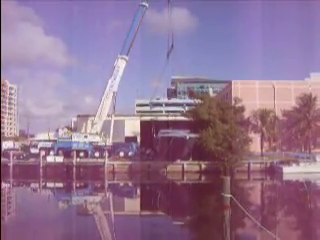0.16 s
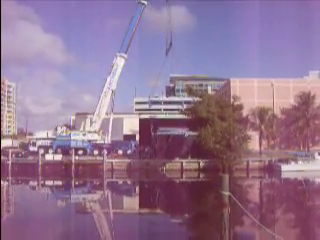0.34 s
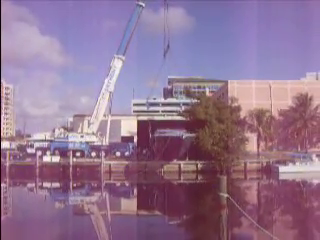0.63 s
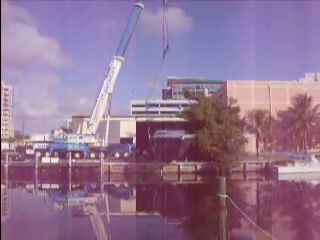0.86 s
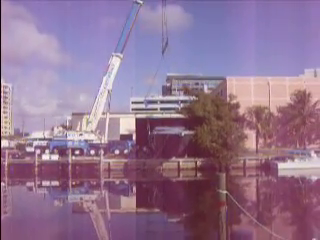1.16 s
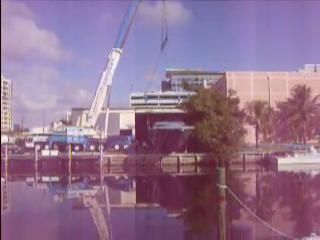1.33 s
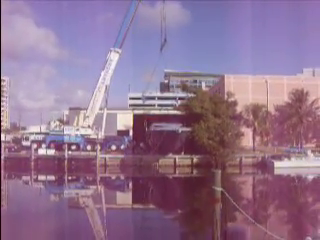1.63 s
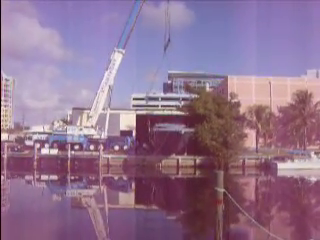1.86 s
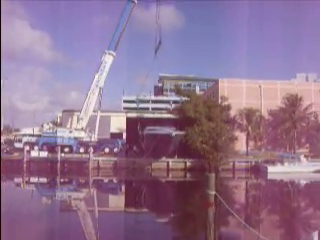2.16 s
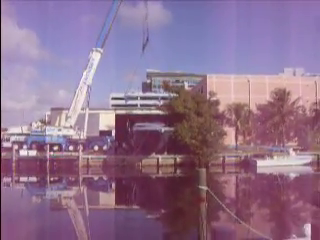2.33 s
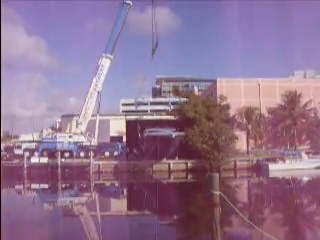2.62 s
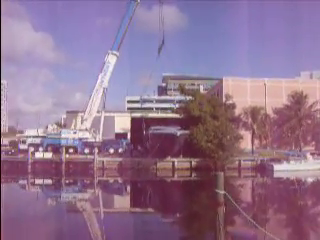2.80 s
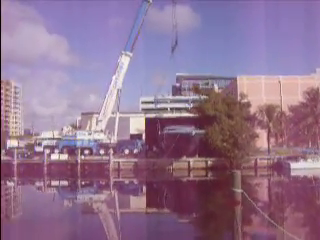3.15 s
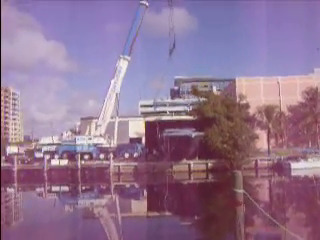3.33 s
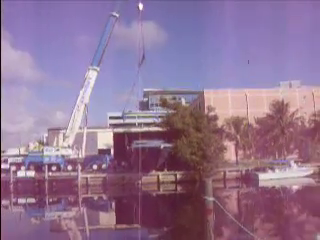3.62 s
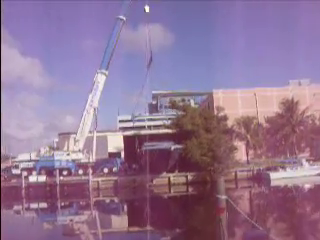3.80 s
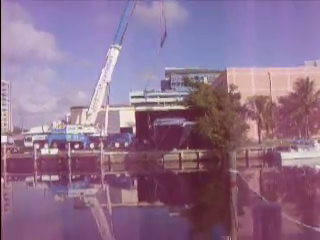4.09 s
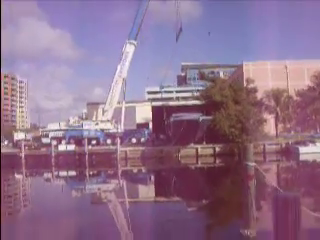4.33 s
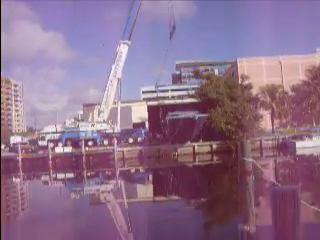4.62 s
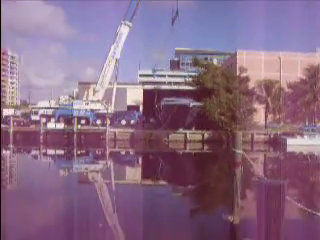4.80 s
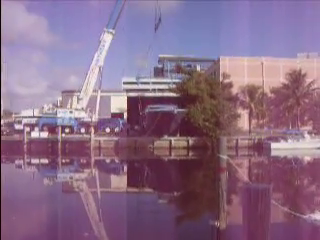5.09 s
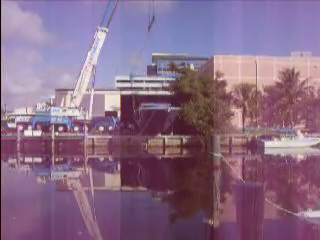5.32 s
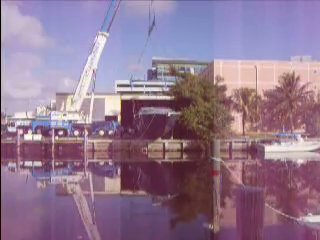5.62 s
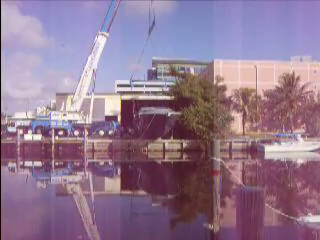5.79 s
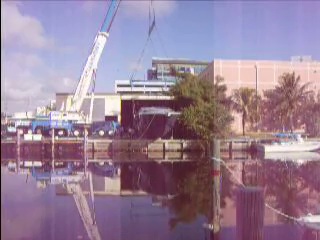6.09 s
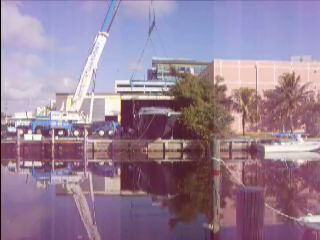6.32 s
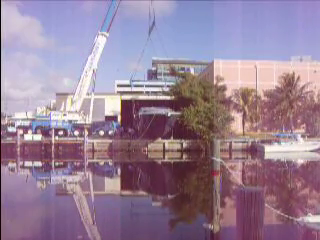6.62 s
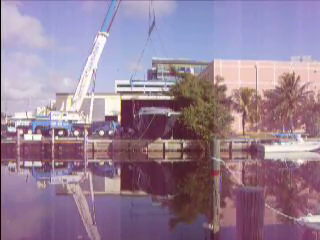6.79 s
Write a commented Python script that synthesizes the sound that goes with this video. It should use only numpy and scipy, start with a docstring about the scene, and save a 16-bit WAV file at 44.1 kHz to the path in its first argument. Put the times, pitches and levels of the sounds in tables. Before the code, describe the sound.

A mobile crane's large diesel engine idles across a canal, making a low, even hum with light mechanical clatter, fan rush and faint high whines. A slower motor throbs underneath. The engine's tone shifts slightly as the handheld microphone moves along the opposite bank. The camera's plastic case clicks close by around three seconds in and again, more sharply, around five seconds, each time followed by faint ticks.

```python
"""A low, steady diesel hum carries across a canal: a mobile crane's six-cylinder engine at idle.
Its exhaust sounds harmonics of the firing rate; block tones, knock and valve clatter repeat with each
four-stroke cycle, over fan rush and thin gear whines. A second, slower motor throbs underneath.
Reflections recolour the engine as the listener moves along the other bank, holding a camera
whose plastic case clicks a few times in the hand."""
import sys
import numpy as np
from scipy import signal
from scipy.fft import rfft, irfft, next_fast_len
from scipy.io import wavfile

SR = 44100
rng = np.random.default_rng(int(sys.argv[2]) if len(sys.argv) > 2 else 0)


def unload_audio(sound):
    """Save the sound as a 16-bit wav file, at the path given as the first command line argument."""
    columns = np.transpose(np.atleast_2d(sound))
    # keep every value between -1 and 1, then stretch to whole-number steps
    steps = np.round(np.clip(columns, -1, 1) * 32767)
    wavfile.write(sys.argv[1], SR, steps.astype(np.int16))


N = 306495
CYLINDERS, TOP_HZ = 6, 11200


def undb(db):
    """Decibels to amplitude ratio."""
    return np.exp(np.asarray(db) * (np.log(10) / 20))


def curves(table):
    """Linear interpolation in time: one curve for each column after time_s."""
    time_s, *columns = np.transpose(table)
    return [np.interp(np.arange(N) / SR, time_s, column) for column in columns]


def along(table, hz):
    """Interpolation of a spectrum on a log-frequency axis."""
    points_hz, values = np.transpose(table)
    return np.interp(np.log(hz + 1e-3), np.log(points_hz), values)


def shaped(x, gain):
    """Filtering as multiplication of the spectrum by gain(hz)."""
    size = next_fast_len(N, real=True)
    hz = np.arange(size // 2 + 1) * SR / size
    return irfft(rfft(x, size) * gain(hz), size)[:N]


def drift(rate_hz):
    """Smooth random modulation with a standard deviation near 1."""
    step = int(SR / rate_hz)
    knots = rng.standard_normal(512)[:N // step + 2, None]
    ease = .5 - .5 * np.cos(np.pi * np.arange(step) / step)
    return 0.96 * (knots[:-1] + np.diff(knots, axis=0) * ease).ravel()[:N]


def eased(middle_s, length_s):
    """A raised-cosine transition from 0 to 1."""
    return .5 + .5 * np.sin(np.pi * np.clip((np.arange(N) / SR - middle_s) / length_s, -.5, .5))


def tone(turns, rms_db):
    """A sinusoid that follows a phase counted in turns."""
    phase = 2 * np.pi * (turns % 1 + rng.random())
    return np.sqrt(2) * undb(rms_db) * np.sin(phase.astype(np.float32))


def strokes(cycle, depth_db, count=24):
    """Periodic amplitude modulation: pistons and valves pulse alike in every cycle."""
    beats = rng.standard_normal(count)
    gain = undb(depth_db * np.interp(cycle, np.arange(count) / count, beats, period=1))
    return gain / np.sqrt(np.mean(gain ** 2))


# Spectrum of air and combustion noise: frequency_hz, density_db (per hertz)
RUSH_SPECTRUM = [(12, -79), (32, -59), (50, -60), (66, -60), (110, -62), (230, -71.5), (400, -70.5),
                 (680, -71.5), (1050, -77.5), (1850, -79.5), (2500, -85), (3600, -82.5), (5300, -86),
                 (7400, -92.5), (10000, -94.5), (12000, -102)]

def rush(cycle, flutter_db=0.26):
    """Turbulence: fan air and combustion make broadband noise that pulses slightly with the strokes."""
    noise = shaped(rng.standard_normal(N), lambda hz: undb(along(RUSH_SPECTRUM, hz))) * np.sqrt(SR / 2)
    return noise * strokes(cycle, depth_db=0.67) * undb(flutter_db * drift(15))


# Tones of the gears and pumps at mean engine speed: pitch_hz, level_db
GEAR_TONES = [(1814, -64), (2702, -68), (3055, -72.5), (4052, -68.5), (4395, -74), (5888, -66)]

def gear_whine(cycle, mean_cycle_hz, waver_db=5.5, smear_turns=0.17):
    """Fixed gear ratios lock each whine to the crankshaft; the air fades it in and out."""
    return sum(tone(cycle * hz / mean_cycle_hz + smear_turns * drift(5), db + waver_db * drift(1.42))
               for hz, db in GEAR_TONES)


# Resonances of the valve gear: centre_hz, half_width_hz, level_db
VALVE_RESONANCES = [(3980, 120, -62.5), (4900, 160, -63), (5883, 190, -58.5), (6900, 200, -67)]

def valves(cycle, waver_db=2.5):
    """Forced resonance: valve ticks, as pulsing noise, keep high, narrow bands ringing."""
    out = 0
    for centre_hz, half_width_hz, db in VALVE_RESONANCES:
        ticks = rng.standard_normal(N) * strokes(cycle, depth_db=1.0)
        ring = shaped(ticks, lambda hz: 1 / (1 + 1j * (hz - centre_hz) / half_width_hz) ** 2)
        out += ring / np.std(ring) * undb(db + waver_db * drift(3.41))
    return out


# Partials of the second motor: pitch_hz, level_db
MOTOR_PARTIALS = [(35.07, -37), (70.2, -49.5)]

def slow_motor(speed_spread=0.0033, waver_db=2.3):
    """Frequency and amplitude modulation: an independent motor hunts around its speed and throbs."""
    clock_s = np.cumsum(1 + speed_spread * drift(3.6)) / SR
    return sum(tone(hz * clock_s, db + waver_db * drift(4.1)) for hz, db in MOTOR_PARTIALS)


# Modes of the plastic case: pitch_hz, relative_db, t60_s
CASE_MODES = [(532, -16, 0.051), (790, -13, 0.03), (1500, -5.5, 0.011), (2965, 0.5, 0.0052),
              (3530, 2.5, 0.0053), (5530, 6, 0.0073), (6640, 1, 0.0047), (7780, -3.5, 0.0033)]
# Snaps of the case: start_s, peak_db, tilt_db_per_octave
CASE_SNAPS = [(2.8503, -7.5, -1.5), (2.9457, -21.5, -1), (2.9922, -24, 3), (3.2505, -20.5, -5),
              (4.9720, -0.5, 4.5), (5.0228, -21.5, -7.5), (5.21, -23, 4), (5.342, -21, -7),
              (5.388, -25, -9)]

def case_clicks(retouch_s=0.000643, retouch_db=-6, thud_db=-8, thud_slope=1.2):
    """Impact excites damped modes: the case snaps and cracks, touches again, scuffs and seats."""
    out, t = np.zeros(N), np.arange(SR // 20) / SR
    mode_hz, mode_db, mode_t60_s = np.transpose(CASE_MODES)[:, :, None]
    octaves = np.log2(mode_hz / mode_hz.mean())
    crack_lowpass = signal.butter(2, 4200, fs=SR, output="sos")

    def ring(hz, t60_s, lag_s=0):
        """Free decay of a struck mode."""
        age = np.maximum(t - lag_s, 0)
        return np.sin(2 * np.pi * hz * age) * np.exp(-np.log(1000) * age / t60_s)

    def grit(db, t60_s):
        """Exponentially decaying noise."""
        return undb(db) * rng.standard_normal(len(t)) * np.exp(-np.log(1000) * t / t60_s)

    for start_s, peak_db, tilt_db in CASE_SNAPS:
        touches = ring(mode_hz, mode_t60_s) + undb(retouch_db) * ring(mode_hz, mode_t60_s, retouch_s)
        snap = np.sum(undb(mode_db + tilt_db * octaves) * touches, axis=0)
        crack = signal.sosfilt(crack_lowpass, grit(db=-17, t60_s=0.021))
        # sliding friction drives the same modes
        scuff = signal.fftconvolve(grit(db=-25, t60_s=0.023), snap / np.linalg.norm(snap))[:len(t)]
        # softer clicks have a smaller share of thud
        thud = undb(thud_db + thud_slope * peak_db) * ring(hz=520, t60_s=0.0057, lag_s=0.0051)
        i = int(start_s * SR)
        out[i:i + len(t)] += undb(peak_db) * (snap / np.abs(snap).max() + crack + scuff - thud)
    return out


# Change of colour over the listener's move: frequency_hz, change_db
COLOUR_SHIFT = [(330, 0), (520, 2), (650, -2), (760, -1.5), (870, 1.5), (1000, -2), (1380, 3), (1750, -1),
                (2150, -2.5), (2700, 0.5)]
# Bands that swell in passing: middle_s, centre_hz, boost_db
PASSING_BANDS = [(2.45, 563, 3.5), (3.15, 664, 5.5), (3.95, 980, 4), (4.6, 1280, 4.5), (6.7, 1440, 6.5)]
# Gain of the machinery along the way: time_s, midrange_db, treble_db
PATH_GAINS = [(0, 0.1, 0.2), (2.2, 0.2, 0.6), (2.9, 0.2, 1.3), (4.3, 0, 1), (5.2, 0.5, -0.6),
              (5.8, 0.1, -.7), (6.9, -1.5, -2)]

def over_water(x, swell_s=0.58, swell_octaves=0.13, bass_hz=417, treble_hz=2800):
    """Interference: reflections from water and quay colour the sound differently from place to place."""
    t = np.arange(N) / SR
    before = shaped(x, lambda hz: undb(-along(COLOUR_SHIFT, hz) / 2))
    after = shaped(x, lambda hz: undb(along(COLOUR_SHIFT, hz) / 2))
    out = before + (after - before) * eased(middle_s=3.1, length_s=3.5)
    for middle_s, centre_hz, boost_db in PASSING_BANDS:
        band = shaped(out, lambda hz: np.exp(-(np.log2((hz + 1) / centre_hz) / swell_octaves) ** 2))
        swell = np.exp(-((t - middle_s) / swell_s) ** 2)
        out += band * (undb(boost_db * swell) - 1)
    bass = shaped(out, lambda hz: np.exp(-(hz / bass_hz) ** 2))
    treble = shaped(out, lambda hz: 1 - np.exp(-(hz / treble_hz) ** 2))
    midrange = out - bass - treble
    midrange_db, treble_db = curves(PATH_GAINS)
    return bass + midrange * undb(midrange_db) + treble * undb(treble_db)


# Envelope of the weaker engine orders: frequency_hz, line_level_db
CLATTER_SPECTRUM = [(25, -61), (130, -62), (220, -62), (500, -66), (800, -65.5), (1150, -64.5), (1550, -76),
                    (1950, -71), (2400, -79.5), (3100, -87), (4300, -90), (7000, -101.5)]

def clatter(cycle, mean_cycle_hz, scatter_db=4.5, blend_radians=0.63, size=8192):
    """Periodic knocks and ticks have a line spectrum; two such patterns slowly trade places."""
    orders = np.arange(size // 2 + 1)
    line_hz = orders * mean_cycle_hz
    # the exhaust and the block sound these orders themselves
    taken = [0, CYLINDERS, 2 * CYLINDERS, 3 * CYLINDERS] + [order for order, _ in BLOCK_ORDERS]
    sounding = ~np.isin(orders, taken) & (line_hz < TOP_HZ)
    patterns = []
    for _ in range(2):
        line_db = along(CLATTER_SPECTRUM, line_hz) + scatter_db * rng.standard_normal(len(orders))
        lines = sounding * undb(line_db) * np.exp(2j * np.pi * rng.random(len(orders)))
        one_cycle = irfft(lines) * size / np.sqrt(2)
        patterns.append(np.interp(cycle % 1 * size, np.arange(size), one_cycle))
    blend = blend_radians * drift(1.23)
    return np.cos(blend) * patterns[0] + np.sin(blend) * patterns[1]


# Strongest tones of the engine block: order (multiple of the cycle rate), level_db
BLOCK_ORDERS = [(3, -51), (7, -52.5), (8, -59), (9, -45), (11, -67.5), (22, -52.5), (24, -54.5), (28, -53),
                (36, -52.5), (41, -55), (42, -51.5), (49, -57), (51, -56.5), (55, -58), (57, -52.5),
                (58, -52.5), (59, -61.5), (60, -54.5), (63, -58), (66, -57), (74, -53), (75, -53.5),
                (80, -57), (86, -54), (93, -58.5)]

def engine_block(cycle, waver_db=1.3, smear_turns=0.042):
    """Forced vibration at multiples of the cycle rate; each tone wavers on its way over the water."""
    return sum(tone(order * cycle + smear_turns * drift(2.91), db + waver_db * drift(1.955))
               for order, db in BLOCK_ORDERS)


# Course of the fan tone: time_s, level_db
FAN_LEVEL = [(0, -54.5), (1.3, -45.5), (2.6, -60), (4, -46.5), (5.35, -42), (5.75, -51.5), (6.15, -43.5),
             (6.9, -47)]

def fan(cycle, order=21.53, waver_db=3.5):
    """A belt drive's non-integer ratio puts the fan tone between the engine's harmonics."""
    return tone(cycle * order, curves(FAN_LEVEL)[0] + waver_db * drift(4.5))


# Exhaust harmonics, fundamental first, before and after the listener's move: before_db, after_db
EXHAUST_HARMONICS = [(-28.5, -29.5), (-37.5, -30.5), (-46, -55)]

def exhaust(cycle, waver_db=.5):
    """The muffler is an acoustic low-pass filter: it rounds the firing pulses to three harmonics."""
    moved = eased(middle_s=2.09, length_s=2.54)
    firing_phase = 2 * np.pi * CYLINDERS * cycle
    hum = 0
    for harmonic, (before_db, after_db) in enumerate(EXHAUST_HARMONICS, start=1):
        rms_db = before_db + (after_db - before_db) * moved + waver_db * drift(9)
        hum -= np.sqrt(2) * undb(rms_db) * np.cos(harmonic * firing_phase)
    return hum


# Engine speed, hunting slowly at idle: time_s, firing_rate_hz
FIRING_RATE = [(0.1, 79.06), (1.4, 78.79), (2.3, 78.91), (3, 78.64), (4.4, 78.83), (5.2, 79.55),
               (5.85, 78.48), (6.85, 78.87)]

def scene():
    """Superposition: engine layers locked to one four-stroke cycle, plus the second motor and clicks."""
    cycle_hz = curves(FIRING_RATE)[0] / CYLINDERS
    cycle = np.cumsum(cycle_hz) / SR  # engine cycles elapsed
    machinery = engine_block(cycle) + gear_whine(cycle, cycle_hz.mean())
    machinery += clatter(cycle, cycle_hz.mean()) + rush(cycle) + valves(cycle)
    crane = exhaust(cycle) + fan(cycle) + over_water(machinery)
    return (crane + slow_motor() + case_clicks())[None]


def record(dry):
    """Band limiting: a steep low-pass filter cuts the highest treble."""
    return signal.sosfilt(signal.butter(22, TOP_HZ, fs=SR, output="sos"), dry)


dry = scene()
out = record(dry)
unload_audio(out)
```